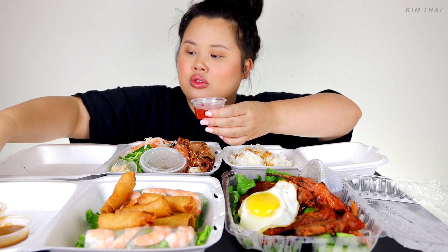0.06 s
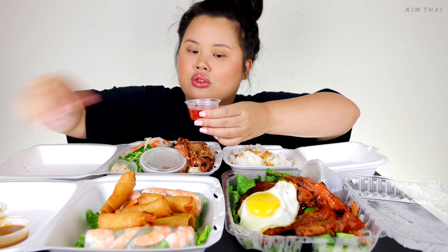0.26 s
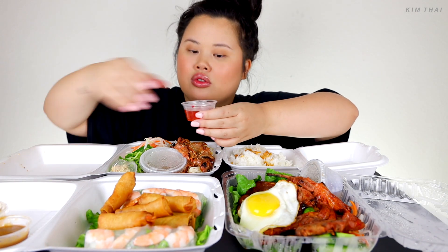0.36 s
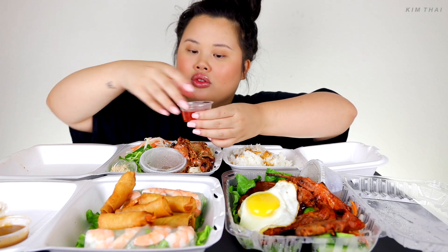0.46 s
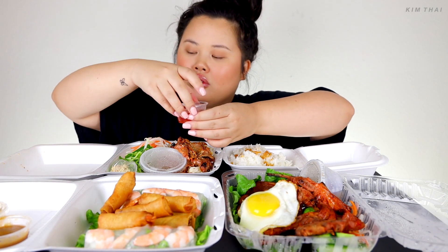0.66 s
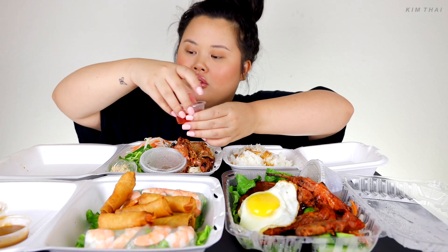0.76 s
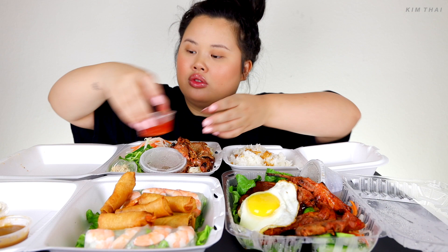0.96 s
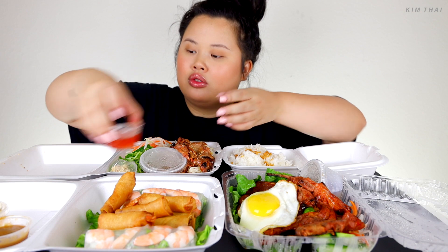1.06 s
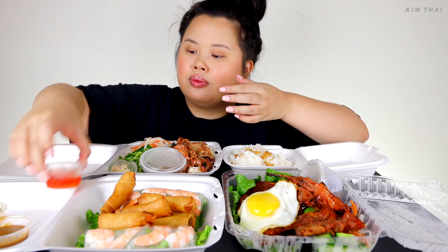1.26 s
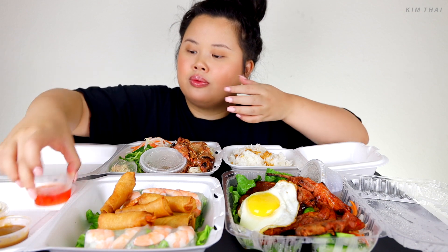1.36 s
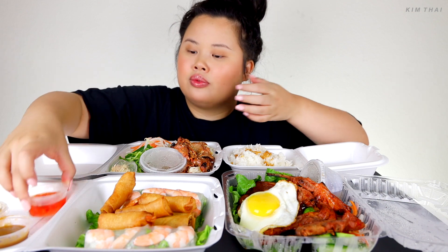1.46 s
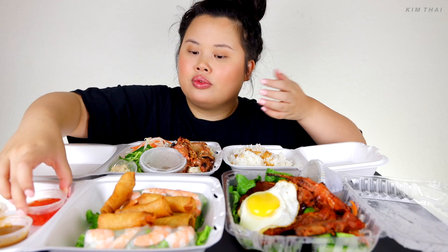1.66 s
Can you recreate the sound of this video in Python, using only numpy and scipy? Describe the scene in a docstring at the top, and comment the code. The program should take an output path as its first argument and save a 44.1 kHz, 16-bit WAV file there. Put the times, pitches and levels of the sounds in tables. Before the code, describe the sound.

A thin plastic cup clacks sharply among takeaway boxes, then is set down with dull knocks.

```python
"""Thin plastic is shuffled and put down with a sharp clack among takeaway boxes, in a small live room.
Each tap is a broadband push that sets damped modes ringing; ticks of the rim are short bursts around one pitch.
Fingers ease the lid off a sauce cup with faint rubs, and the cup scuffs a foam box: both are grainy noise strokes.
The cup is set down in the box with dull knocks, each a push plus the modes of the box.
All is heard close by in stereo, over a low ventilation hum of steady noise and wavering sine lines."""
import sys
import numpy as np
from scipy import signal
from scipy.fft import rfft, irfft, next_fast_len
from scipy.io import wavfile
from scipy.ndimage import map_coordinates

SR = 44100
rng = np.random.default_rng(int(sys.argv[2]) if len(sys.argv) > 2 else 0)


def wav_out(sig):
    """Save sig, one row per channel (or a flat mono array), as 16-bit PCM at SR to the path in sys.argv[1]."""
    wavfile.write(sys.argv[1], SR, np.round(np.clip(np.atleast_2d(sig).T, -1, 1) * 32767).astype(np.int16))


N = 74970  # samples, 1.7 s
T = np.arange(SR // 2) / SR  # the half second that one event may last, in seconds

# Steady air noise. Each row: frequency in Hz, relative density in dB per Hz.
AIR_COLOUR = [(15, -63), (25, -30), (37, -19.5), (107, -3), (184, -5.5), (205, -9), (228, -5), (291, -5.5),
              (361, -10.5), (392, -6.5), (604, -11.5), (710, -10.5), (1090, -9.5), (1930, -17.5),
              (15800, -33)]
# Coherence of the air noise. Each row: frequency in Hz, left-right likeness (1 is identical).
AIR_LIKENESS = [(50, 1), (300, 0.68), (750, 0.44), (1400, 0.43), (2600, 0), (12000, 0.0049)]
# Hum lines of the ventilation. Each row: frequency in Hz, level in dB.
HUM_LINES = [(118.4, -72), (177.6, -68), (237.5, -81), (360.5, -66.5), (610, -71.5)]

# Plastic tapping the table. Each row: start in seconds, relative level in dB, treble tilt in dB per octave,
# relative ring level in dB, ring length as a share (low while gripped), note of the struck spot in Hz.
TAPS = [(.0005, -24, -2.5, -30, 0.31, 634), (0.032, -27.5, -6.5, -23, 0.72, 654),
        (0.0412, -26, -6.5, -23.5, 0.69, 1040), (.074, -36, -10, -13, 0.56, 808),
        (.092, -34, -11.5, -34, 0.36, 850), (.104, -33.5, -4.5, -13.5, 0.38, 917),
        (.1418, -27.5, -6.5, -35, .4, 826), (.153, -27, -7, -17.5, 0.53, 1330),
        (0.2049, -26.5, -6, -12.5, 0.55, 1642), (.210, -32, 3.5, -25, 0.71, 1140),
        (0.2257, -4.5, 2, -22.5, 1, 1306), (0.2324, -16.5, 1.5, -45, 0.52, 1340),
        (.290, -16.5, -1, -21.5, 0.83, 1342), (.300, -24.5, 0.5, -10.5, 0.68, 600),
        (0.3172, -21, -1, -24, 0.47, 1630)]
# Spectrum of the tap's push. Each row: frequency in Hz, relative level in dB.
TAP_COLOUR = [(25, -71), (60, -51), (95, -22.5), (140, -25), (210, -15), (380, -12), (650, -4), (900, 0.5),
              (1450, -2.5), (2000, -4.5), (2700, -10.5), (4000, -17.5), (7000, -31), (15000, -52)]
# Modes of the thin wall's brief clatter. Each row: frequency in Hz, relative level in dB, T60 in seconds.
WALL_MODES = [(910, -4, 0.043), (1353, 4, 0.034), (1420, -3, 0.05), (1840, -11, 0.03), (2400, -5.5, 0.041),
              (2825, -12, 0.071), (3460, -13, 0.027)]
# Longer modes of the plastic. Each row: frequency in Hz, relative level in dB, T60 in seconds at full length.
PLASTIC_MODES = [(204, -11, .35), (505, -15, .25), (625, -7, .25), (805, -5, .25), (858, 1.5, .31),
                 (912, -5, .28), (1170, -11, .22), (1367, 3, .2), (1533, 0, .22), (1675, -8, .25),
                 (1910, -7, .15), (1986, -7, .15), (2513, -11, .12), (2804, -9, .12)]

# Fingers sliding on plastic. Each row: start in seconds, rise in seconds, fall by 30 dB in seconds,
# relative level in dB.
RUBS = [(.001, 0.0033, .05, -48), (.026, 0.0033, 0.066, -40), (.088, 0.0051, 0.025, -42),
        (.15, 0.0044, 0.051, -49), (.172, 0.031, 0.027, -42), (.82, .07, 0.055, -56.5),
        (1.11, 0.025, 0.056, -58), (1.21, 0.0066, 0.058, -55)]
# Spectrum of a rub. Each row: frequency in Hz, relative level in dB.
RUB_COLOUR = [(100, -13), (1500, 1.5), (4500, 7.5), (7000, 0.5), (11000, -1.5), (16000, -3.5)]

# Crisp ticks of the rim. Each row: start in seconds, relative level in dB, pitch in Hz.
TICKS = [(0.0255, -36.5, 11000), (0.032, -36, 6650), (0.0888, -31, 8800), (0.1, -31, 8950),
         (.141, -30.5, 6020), (0.203, -35, 6500), (0.2068, -36, 3450), (0.2269, -20.5, 4950),
         (0.2905, -36, 7900), (0.2988, -31, 10000), (0.74, -46, 4500), (.892, -41, 4930),
         (1.675, -37, 10000), (1.6935, -40, 6900)]

# The cup brushing the foam box. Each row: start in seconds, rise in seconds, fall by 30 dB in seconds,
# relative level in dB.
SCUFFS = [(1.410, 0.0057, 0.052, -37), (1.432, 0.0089, 0.048, -45.5), (1.453, 0.0091, 0.034, -48)]
# Spectrum of a scuff. Each row: frequency in Hz, relative level in dB.
SCUFF_COLOUR = [(40, -30), (110, -1), (220, -12), (370, 3.5), (550, -7.5), (680, -1.5), (950, 0),
                (1150, -6.5), (1500, -3.5), (2400, -13), (5000, -18), (9000, -23.5), (15000, -22.5)]

# The cup landing in the foam box. Each row: start in seconds, relative level in dB,
# treble tilt in dB per octave.
KNOCKS = [(1.659, -22.5, -1), (1.675, -21.5, 0), (1.687, -39, 0)]
# Spectrum of the knock's push. Each row: frequency in Hz, relative level in dB.
KNOCK_COLOUR = [(30, -40), (130, -4.5), (300, -1), (700, -1.5), (1000, -6.5), (1500, -3.5), (2400, -10.5),
                (3500, -19), (8000, -26), (15000, -34)]
# Modes of the foam box. Each row: frequency in Hz, relative level in dB, T60 in seconds.
BOX_MODES = [(258, -16, 0.17), (340, -3, 0.2), (681, 0, 0.16), (1370, -18, .1), (1720, -12, 0.06),
             (2340, -8, 0.057), (2550, -5, 0.085)]

# First echoes off the walls. Each row: delay in seconds, level in dB.
WALL_ECHOES = [(.00318, -6), (.0067, -12)]
# Reverberation time of the room. Each row: frequency in Hz, T60 in seconds.
ROOM_T60 = [(100, 0.96), (300, 0.36), (1000, 0.33), (2500, 0.32), (6000, 0.26), (15000, .2)]
# Spectrum of the room's tail. Each row: frequency in Hz, relative level in dB.
ROOM_COLOUR = [(100, 0.5), (500, 5), (1500, 4.5), (3000, 1.5), (7000, 2.5), (15000, 4)]
# Coherence of the tail. Each row: frequency in Hz, left-right likeness (1 is identical, below 0 opposed).
ROOM_LIKENESS = [(100, 1), (350, 0.95), (750, 0.6), (1400, 0.38), (2600, -0.084), (5000, -0.027),
                 (12000, -0.053)]

AIR_DB = -54
SPOT_DB, SPOT_T60_S = -6.5, 0.062  # the struck spot's own note
WALL_HARDNESS = 4  # how strongly the blow's tilt acts on the wall's high modes
TICK_OCTAVES, TICK_T60_S, TICK_PAN_DB = 0.41, 0.0068, 10.5
GRAINS_PER_S = 6000
ROOM_BUILD_S = 0.0031
CLUTTER_DB, CLUTTER_T60_S = 10, 0.029  # quick scatter off the boxes, over the room's tail
TOP_HZ = 16100


def amp(db):
    """Level to amplitude: 20 dB is a factor of ten."""
    return 10 ** (np.asarray(db) / 20)


def unit(x):
    """Normalization to a root mean square of 1."""
    return x / np.sqrt(np.mean(x ** 2) + 1e-20)


def along(points, hz):
    """Interpolation of (Hz, value) points on a logarithmic frequency axis."""
    f, v = np.transpose(points)
    return np.interp(np.log(hz + 1), np.log(f + 1), v)


def filtered(x, response):
    """Linear filtering: the spectrum of x times a response of frequency."""
    n = x.shape[-1]
    m = next_fast_len(n + 8192)
    return irfft(rfft(x, m) * response(np.fft.rfftfreq(m, 1 / SR)), m)[..., :n]


def pulse(colour_db, size=4096):
    """Minimum phase: the shortest causal pulse of a given spectrum, peak 1."""
    hz = np.fft.rfftfreq(size, 1 / SR)
    cepstrum = irfft(np.log(amp(colour_db(hz)) + 1e-6))
    # folding the cepstrum onto positive time makes the pulse causal
    cepstrum[1:size // 2] *= 2
    cepstrum[size // 2 + 1:] = 0
    p = irfft(np.exp(rfft(cepstrum)))
    return p / np.abs(p).max()


def diffuse(pair, colour, likeness):
    """Diffuse-field coherence: two unrelated noises mixed as mid and side to a given left-right likeness."""
    def mid_side(hz):
        angle = np.arccos(np.clip(along(likeness, hz), -1, 1)) / 2
        return amp(along(colour, hz)) * np.array([np.cos(angle), np.sin(angle)])

    mid, side = filtered(pair, mid_side)
    return np.array([mid + side, mid - side])


def add(out, s, x):
    """Superposition: x is summed into out from time s."""
    i = max(0, round(s * SR))
    out[:, i:i + x.shape[1]] += x[:, :N - i]


def reverberation(x):
    """Reverberation: noise that decays at each frequency's own rate, convolved with the sound."""
    hz, t, z = signal.stft(rng.standard_normal((2, len(T))), SR, nperseg=256)
    decay = amp(-60 * t / along(ROOM_T60, hz)[:, None])
    tail = signal.istft(z * decay, SR, nperseg=256)[1][:, :len(T)]
    build_up = 1 - np.exp(-T / ROOM_BUILD_S)
    clutter = amp(CLUTTER_DB - 60 * T / CLUTTER_T60_S)
    tail = unit(tail * build_up * (1 + clutter)) / np.sqrt(len(T))  # energy 1 per channel on average
    return signal.fftconvolve(x[None], diffuse(tail, ROOM_COLOUR, ROOM_LIKENESS), axes=1)[:, :len(T)]


def in_room(x, wet_db, pan_db, lag_ms):
    """Direct and reflected sound: the right channel is later and duller, with two echoes and a tail."""
    def paths(f):
        shade = amp(pan_db / 2 * f ** 2 / (f ** 2 + 3000 ** 2))  # acts on the treble
        lag = np.exp(-2j * np.pi * f * lag_ms / 1000)
        echoes = sum(amp(db) * np.exp(-2j * np.pi * f * s) for s, db in WALL_ECHOES)
        softened = echoes / (1 + 1j * f / 3500)
        return np.array([shade, lag / shade]) + softened

    return filtered(x, paths) + amp(wet_db) * reverberation(x)


def contact(colour_db, crunch_db, crunch_t60):
    """Impact excitation: one push followed by a brief decaying crunch of the surfaces."""
    crunch = unit(rng.standard_normal(len(T)) * amp(-60 * T / crunch_t60)) / np.sqrt(len(T))
    force = amp(crunch_db) * crunch
    force[0] += 1
    return -signal.fftconvolve(force, pulse(colour_db))[:len(T)]


def ring(modes, scatter_db, length=1, attack_s=0.0017, disorder=1):
    """Modal decay: damped modes that vary per blow, the high ones more out of step between channels."""
    out = np.zeros((2, len(T)))
    for hz, db, t60 in modes:
        size, phase, skew = rng.standard_normal(3)
        turn = np.pi * disorder * phase + np.array([[1], [-1]]) * skew * hz / 3000
        decay = amp(db + scatter_db * size - 60 * T / (t60 * length))
        out -= decay * np.cos(2 * np.pi * hz * T + turn)
    return out * (1 - np.exp(-T / attack_s))


def tilted(colour, tilt_db):
    """Contact stiffness: a harder blow has a brighter spectrum, a softer one a duller."""
    return lambda hz: along(colour, hz) + tilt_db * np.log2((hz + 100) / 1200)


def ventilation():
    """Stationary noise plus tones: steady air noise with hum lines whose phase wavers slightly."""
    t = np.arange(N) / SR
    hum = np.zeros(N)
    for hz, db in HUM_LINES:
        cycles = hz * t + rng.random()
        drift = map_coordinates(rng.standard_normal(16), [t * 6], mode="mirror")  # six random points a second
        hum += amp(db) * np.sqrt(2) * np.sin(2 * np.pi * cycles + 0.47 * drift)
    air = unit(diffuse(rng.standard_normal((2, N)), AIR_COLOUR, AIR_LIKENESS))
    return amp(AIR_DB) * air + hum


def taps():
    """Modal excitation by impact: hollow plastic rings briefly when held; duller blows spare high wall modes."""
    out = np.zeros((2, N))
    for s, db, tilt_db, ring_db, length, spot_hz in TAPS:
        push = contact(tilted(TAP_COLOUR, tilt_db), crunch_db=-6, crunch_t60=0.018)
        excited = [(hz, level + WALL_HARDNESS * tilt_db * np.log2(hz / 1000), t60)
                   for hz, level, t60 in WALL_MODES]
        wall = amp(-16) * ring(excited, scatter_db=-2, attack_s=0.00058, disorder=0.11)
        spot = ring([(spot_hz, SPOT_DB, SPOT_T60_S)], scatter_db=-2.5, disorder=0.1)
        body = amp(ring_db + 1) * ring(PLASTIC_MODES, scatter_db=-0.5, length=length)
        heard_push = in_room(push, wet_db=0.5, pan_db=9, lag_ms=0.12)
        add(out, s, amp(db) * (heard_push + wall + spot + body))
    return out


def friction(strokes, colour, smooth, wet_db, pan_db):
    """Stick-slip friction: dense random slips over smooth noise, under a stroke that swells and dies."""
    out = np.zeros((2, N))
    for s, rise, fall, db in strokes:
        noise = rng.standard_normal(len(T))
        grains = rng.random(len(T)) < GRAINS_PER_S / SR
        slips = noise * (smooth + grains)
        stroke = np.minimum(T / rise, 1) * amp(-60 * np.maximum(T - rise, 0) / (2 * fall))
        x = unit(filtered(slips, lambda hz: amp(along(colour, hz)))) * stroke
        add(out, s, amp(db) * in_room(x, wet_db, pan_db, lag_ms=0.086))
    return out


def rubs():
    """Sliding friction of fingers on plastic: faint, bright grainy noise."""
    return amp(-5.5) * friction(RUBS, RUB_COLOUR, smooth=0.22, wet_db=-1.5, pan_db=8.5)


def ticks():
    """Band-limited impulses: tiny bright crackles of the thin rim, each centred on its pitch."""
    out = np.zeros((2, N))
    for s, db, pitch_hz in TICKS:
        def colour(hz):
            octaves = np.log2((hz + 1) / pitch_hz)
            return -10 * np.log10(1 + (octaves / TICK_OCTAVES) ** 4)

        x = contact(colour, crunch_db=12, crunch_t60=TICK_T60_S)
        add(out, s, amp(db - 16) * in_room(x, wet_db=-7.5, pan_db=TICK_PAN_DB, lag_ms=0.14))
    return out


def scuffs():
    """Sliding friction of the cup on the foam box: duller grainy noise."""
    return amp(-1) * friction(SCUFFS, SCUFF_COLOUR, smooth=0.38, wet_db=-3.5, pan_db=5.5)


def knocks():
    """Impact on a compliant body: the full cup lands on foam in quick dull knocks that ring the box."""
    out = np.zeros((2, N))
    for s, db, tilt_db in KNOCKS:
        push = contact(tilted(KNOCK_COLOUR, tilt_db), crunch_db=-2, crunch_t60=0.025)
        heard_push = in_room(push, wet_db=-2, pan_db=8, lag_ms=0.08)
        box = amp(-16.5) * ring(BOX_MODES, scatter_db=0.0)
        add(out, s, amp(db) * (heard_push + box))
    return out


def scene():
    """Superposition of all the handling over the room's background."""
    sliding = rubs() + scuffs()
    striking = taps() + ticks() + knocks()
    return sliding + striking + ventilation()


def record(dry):
    """Band limiting: a very steep low-pass leaves almost nothing above the top frequency."""
    return filtered(dry, lambda hz: 1 / np.sqrt(1 + (hz / TOP_HZ) ** 200))


dry = scene()
out = record(dry)
wav_out(out)
```